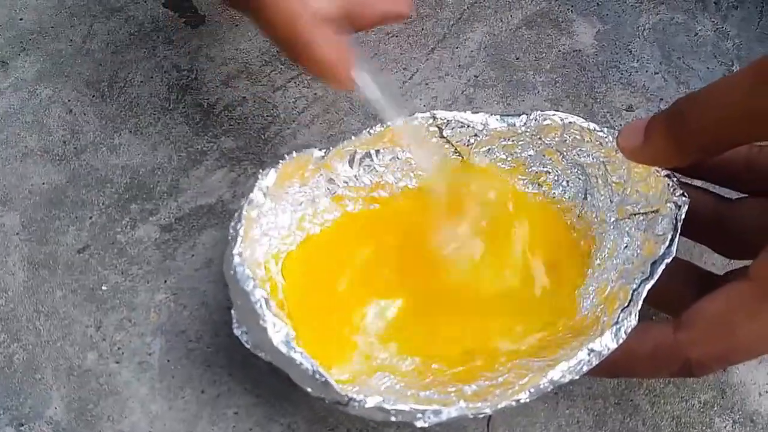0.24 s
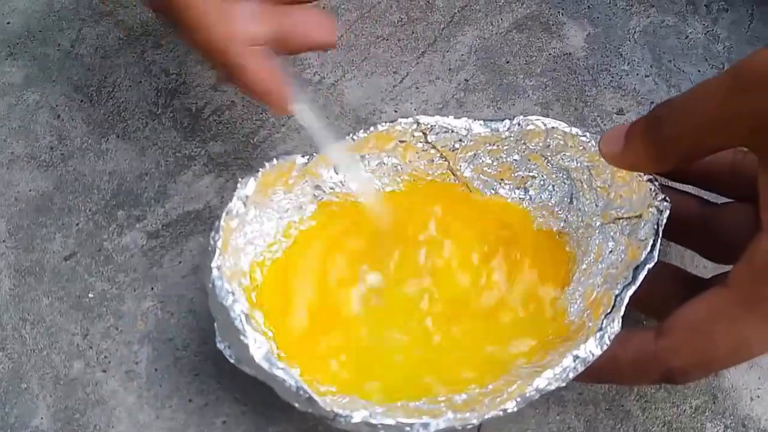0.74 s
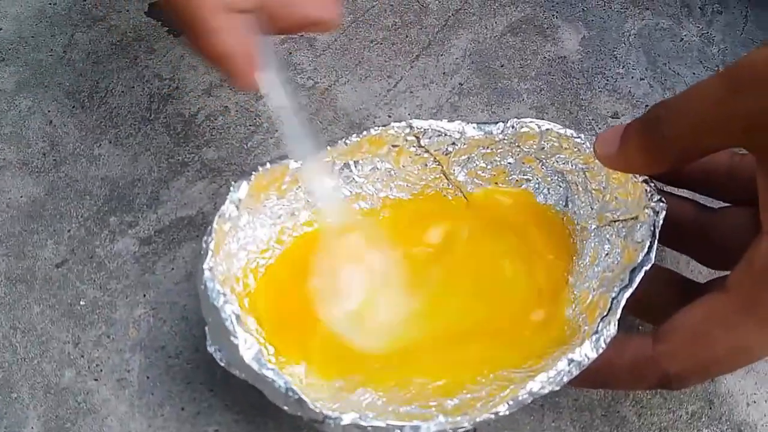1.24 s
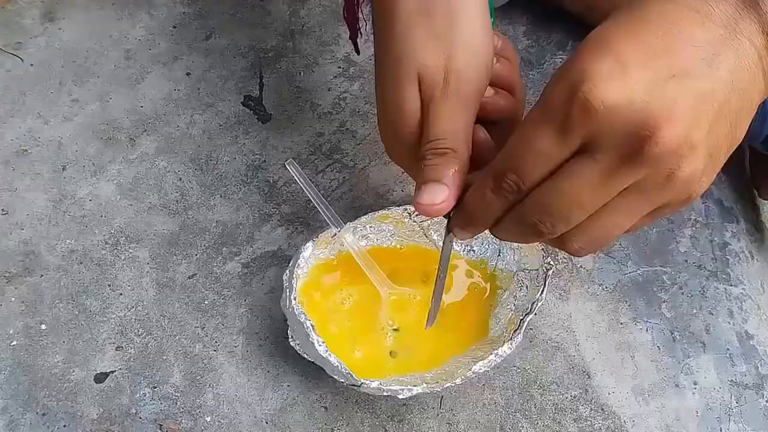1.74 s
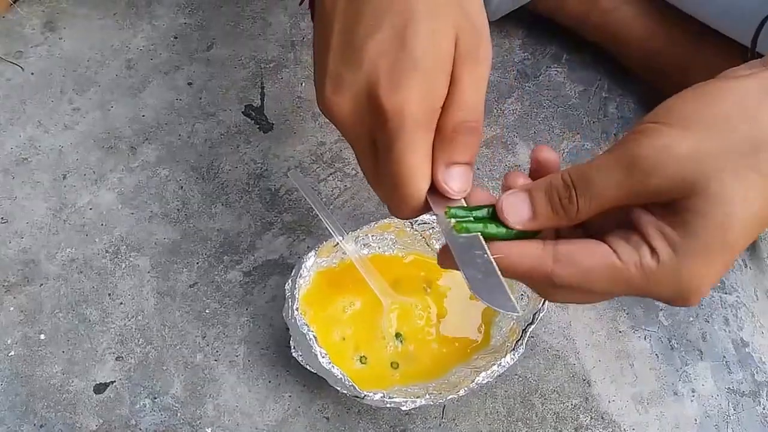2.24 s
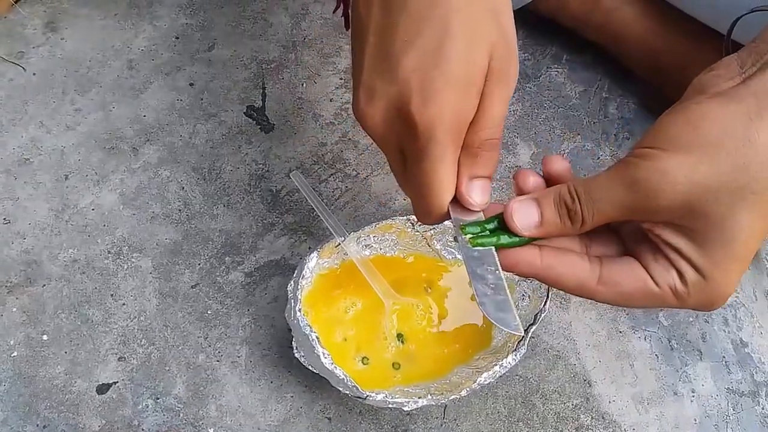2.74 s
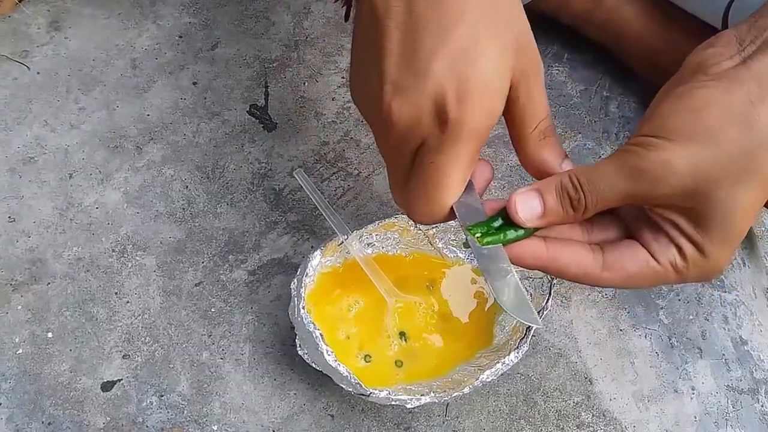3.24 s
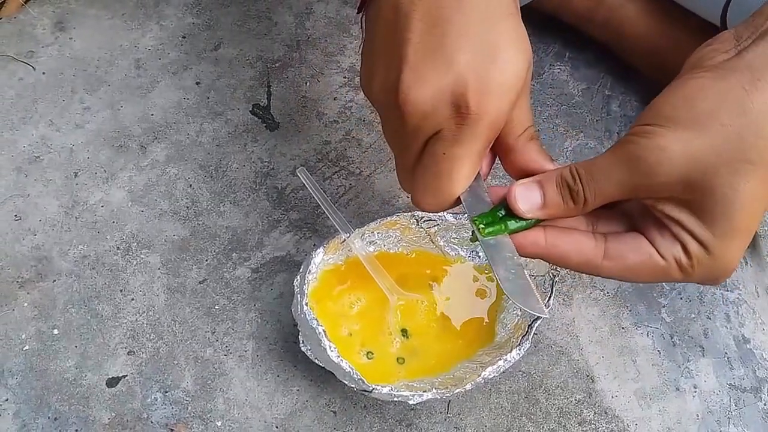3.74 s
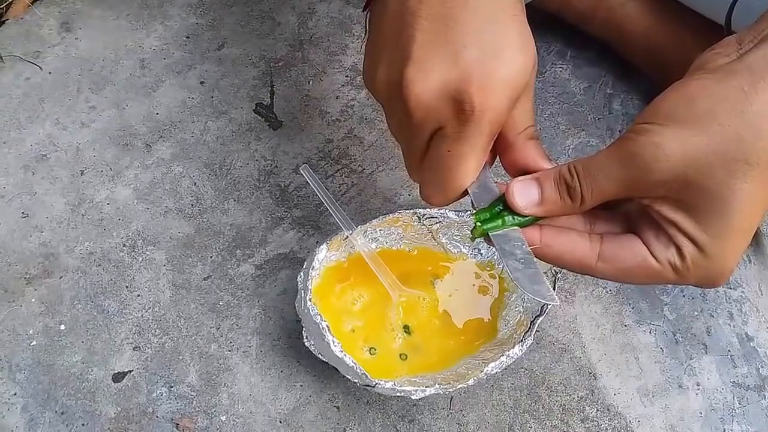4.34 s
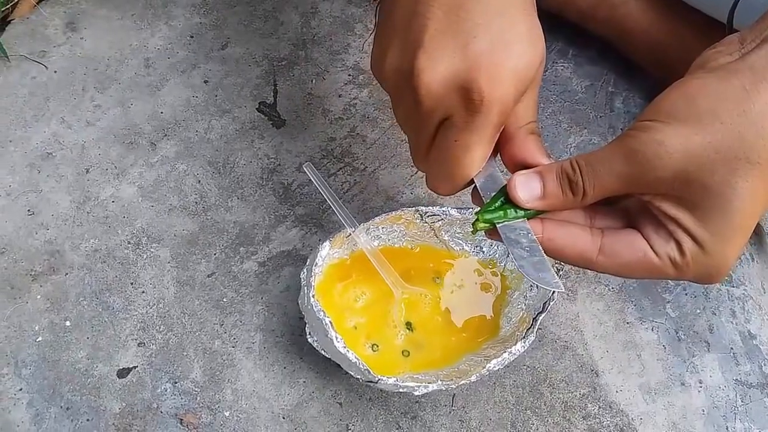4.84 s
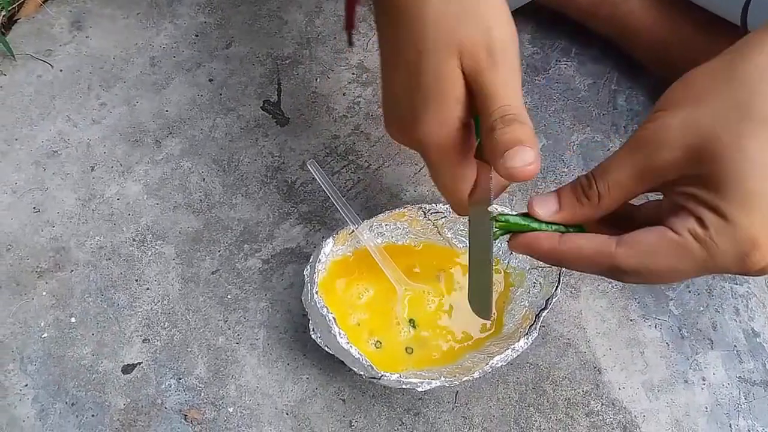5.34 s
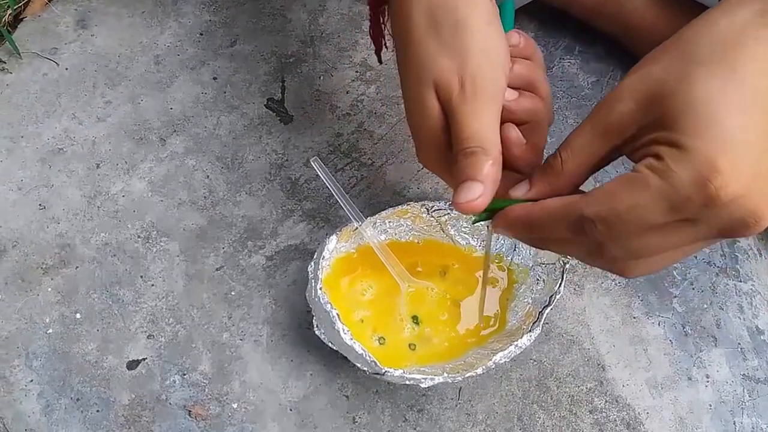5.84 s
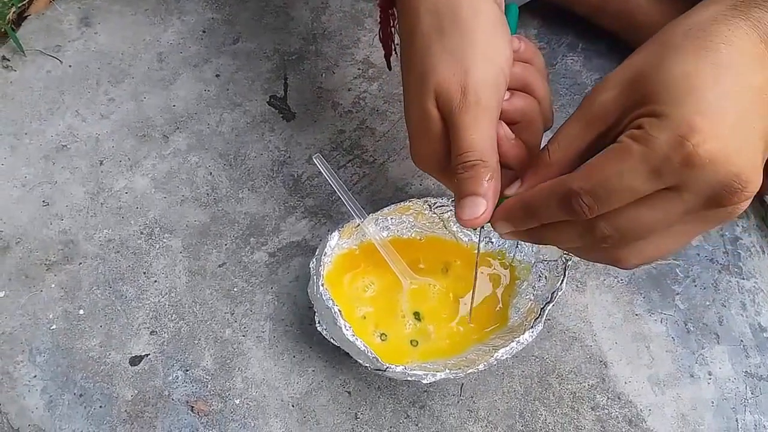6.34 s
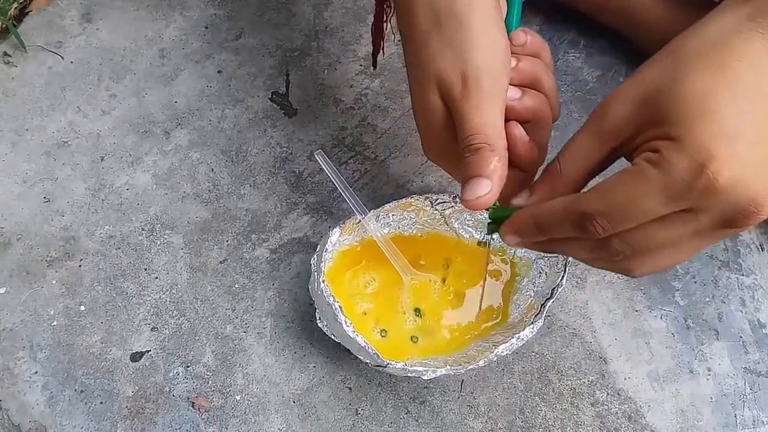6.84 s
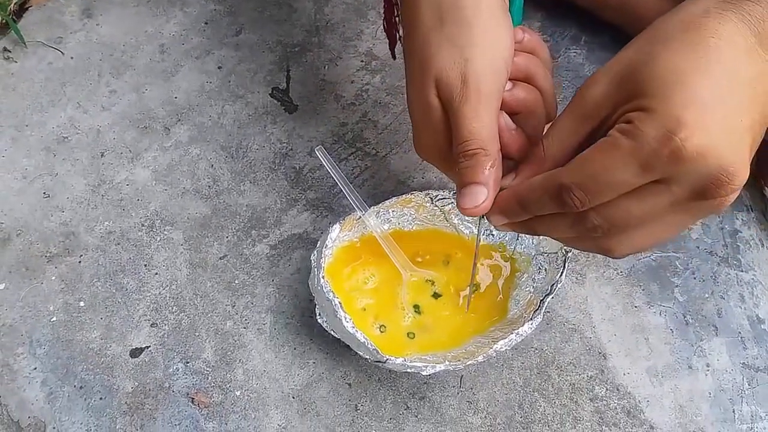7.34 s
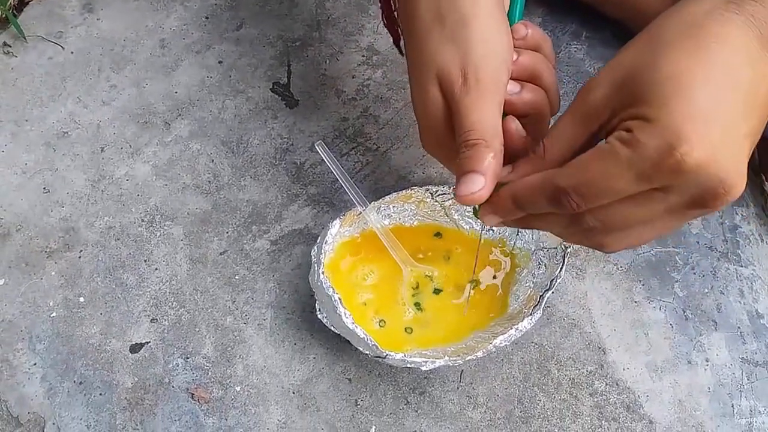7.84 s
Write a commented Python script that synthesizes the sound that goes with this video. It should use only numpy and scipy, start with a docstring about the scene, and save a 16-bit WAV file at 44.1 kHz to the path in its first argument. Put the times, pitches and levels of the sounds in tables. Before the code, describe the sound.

Rapid tinny taps and scrapes on foil mix with hollow, rising egg plops for a second and a half, very near a small microphone. A burst of hard bright snaps cuts them off. Afterwards thin metallic ticks and faint rubs are scattered over a distant steady engine throb, fluttering crickets, chirping sparrows, whistling birds, soft coos and faint caws in open air.

```python
"""Outdoors, close to a small microphone: a plastic fork beats eggs in a crumpled foil bowl, then a knife
snaps and ticks through a chilli. Bursts of tiny snaps ring the foil and blade; pops are short rising tones.
Far off, a slow engine throbs as a sum of steady orders in a wash of shaped noise. Insects are fluttering
noise bands; small birds, a crow and a dove call in gliding, blurred tones with a short echo."""
import sys
import numpy as np
from scipy import signal
from scipy.io import wavfile
from scipy.ndimage import uniform_filter1d

SR = 44100
rng = np.random.default_rng(int(sys.argv[2]) if len(sys.argv) > 2 else 0)


def invert_db(x):
    """Field ratio 10**(x/20) for x, a level in decibels (scalar or array-like)."""
    u = np.asarray(x, float) / 20
    return 10 ** u


def materialize(psi):
    """Save the field psi as 16-bit PCM at rate SR to the path in sys.argv[1].

    A 1-D psi becomes a single channel; in a 2-D psi each row is a channel.
    """
    bounded = np.clip(np.atleast_2d(psi).T, -1, 1)
    quanta = np.round(bounded * 32767).astype(np.int16)
    wavfile.write(sys.argv[1], SR, quanta)


N = 355887
BEAT_END_S = 1.6  # stirring, small unplanned pops and stray taps stop here

# resonances of the foil bowl: centre_hz, width_hz, relative_db
FOIL_MODES = [(1600, 1800, 16), (2800, 770, 23), (5190, 970, 35.5), (6060, 370, 17.5), (7900, 2200, -16)]
# resonances of the blade: centre_hz, width_hz, relative_db
BLADE_MODES = [(750, 240, -31.5), (1850, 500, -9.5), (3540, 1500, 6), (5150, 650, 11.5), (5900, 780, 10),
               (7000, 390, 7), (12800, 3100, -19)]


def evened(x):
    """Scales to rms 1."""
    return x / np.sqrt(np.mean(x ** 2) + 1e-20)


def level_curve(rows):
    """Joins (start_s, level_db) points by straight lines over the whole scene."""
    return np.interp(np.arange(N) / SR, *np.transpose(rows))


def add(mix, s, sound):
    """Mixes a sound in at time s."""
    part = mix[round(s * SR):][:len(sound)]
    part += sound[:len(part)]


def resonate(x, hz, width_hz):
    """Shifts the curve hz down to zero, smooths, and shifts back: a resonance of gain 1."""
    turn = np.exp(2j * np.pi * np.cumsum(hz * np.ones(len(x))) / SR)
    r = np.exp(-np.pi * width_hz / SR)
    smoothed = signal.lfilter([1 - r], [1, -r], x / turn)
    return 2 * (turn * smoothed).real


def wander(per_s):
    """Slow chance: random knots of rms 1 joined by lines; after 600 knots the last value holds."""
    knots = rng.standard_normal(600)
    return np.interp(np.arange(N) * per_s / SR, np.arange(len(knots)), knots)


def chorus(db, hz, width_hz, flutter_db, per_s):
    """Noise through three equal resonances: many blurred sources in one fluttering band."""
    band = rng.standard_normal(N)
    for _ in range(3):
        band = resonate(band, hz, width_hz)
    return invert_db(db + flutter_db * wander(per_s)) * evened(band)


def noise_sweep(s, db, length, from_hz, to_hz, width_hz):
    """A fast, wide sweep: a gliding smear of noise that swells and fades."""
    hz = np.linspace(from_hz, to_hz, round(length * SR))
    smear = resonate(resonate(rng.standard_normal(len(hz)), hz, width_hz), hz, width_hz)
    return s, invert_db(db) * evened(smear) * np.hanning(len(hz))


def ring(clicks, modes, dull):
    """Clicks pass the broad resonances; a dull blow favours the low ones."""
    return sum(invert_db(db - 8.74 * dull * np.log2(hz / 6000)) * resonate(clicks, hz, width) / np.sqrt(width)
               for hz, width, db in modes)


def crackles(events, modes, uneven_db, crack, tail_db, tail_s, spot_db=0):
    """Each blow is one sharp crack, a burst of tiny uneven snaps, then a short ragged rattle.
    Events list start_s, level_db, crackle_s, dullness and perhaps the struck spot's pitch_hz."""
    out, t = np.zeros(N), np.arange(6000) / SR
    for s, db, length, dull, *spot in events:
        sign, hiss = rng.standard_normal((2, len(t)))
        size = rng.exponential(1, len(t))
        burst = np.minimum(t / 0.0011, 1) * np.exp(-(t / max(length, .0005)) ** 2)
        snaps = sign * invert_db(uneven_db * np.minimum(size, 4)) * burst
        drive = snaps / np.linalg.norm(snaps) * np.linalg.norm(burst)
        drive[20] += crack
        ragged = invert_db(2.7 * evened(uniform_filter1d(sign, size=90)))
        rattle = invert_db(tail_db - 60 * t / tail_s) * hiss * ragged
        # the struck spot adds a resonance of its own, 370 Hz wide
        struck = modes + [(hz, 370, spot_db) for hz in spot]
        sound = ring(drive, struck, dull) + ring(rattle, modes, dull + 0.6)  # the treble dies first
        add(out, s - .0004, invert_db(db) * sound / (3 * np.std(ring(hiss, struck, 0))))
    return out


def note(s, length, db, from_hz, to_hz, upper_db=-99, blur_hz=100, blurred=.5, arch=0, waver=0):
    """A gliding tone, partly scattered into a fuzzy band by leaves and distance; caws add a harmonic."""
    size = round(length * SR)
    tremble = evened(uniform_filter1d(rng.standard_normal(size), size=300))
    # arch bends the pitch up mid-note, waver makes it tremble (shares of the pitch)
    bend = 1 + arch * (np.sin(np.linspace(0, np.pi, size)) - .5) + waver * tremble
    hz = np.linspace(from_hz, to_hz, size) * bend
    phase = 2 * np.pi * np.cumsum(hz) / SR
    tone = np.sqrt(2) * (np.sin(phase) + invert_db(upper_db) * np.sin(3 * phase / 2))
    fuzz = evened(resonate(resonate(rng.standard_normal(size), hz, blur_hz), hz, blur_hz))
    broken = evened(uniform_filter1d(rng.standard_normal(size), size=350))
    level = invert_db(db + 4.5 * blurred * broken)  # the more blurred a call, the more its level flutters
    return s, level * ((1 - blurred) * tone + blurred * fuzz) * np.hanning(size) ** 0.17


def sing(rows, **voice):
    """Lays notes of one voice along the scene."""
    out = np.zeros(N)
    for row in rows:
        add(out, *note(*row, **voice))
    return out


def air(patchy_db):
    """Distant wash: random short-time spectra with drifting patches."""
    # spectrum of the wash: centre_hz, relative_db (per Hz)
    spectrum = [(22, -53), (36, -18.5), (60, -4), (110, 2), (190, -2), (268, -11.5), (473, -17.5),
                (647, -22), (1040, -27), (2560, -29), (3600, -33), (6280, -36), (15550, -37.5),
                (15800, -85)]
    hz = np.fft.rfftfreq(2048, 1 / SR)
    real, imaginary, patches = rng.standard_normal((N // 512 + 5, len(hz), 3)).T
    patches = uniform_filter1d(patches, size=20, axis=0)
    patches = evened(uniform_filter1d(patches, size=8, axis=1))
    f, db = np.transpose(spectrum)
    shape = invert_db(np.interp(np.log(hz + 1), np.log(f), db)[:, None] + patchy_db * patches)
    wash = signal.istft((real + 1j * imaginary) * shape, nperseg=2048, noverlap=1536)[1][:N]
    above_hum = signal.sosfilt(signal.butter(4, 200, "high", fs=SR, output="sos"), wash)
    return invert_db(-57.5) * wash / np.std(above_hum)  # the level counts only what lies above 200 Hz


def engine(start_s, smear, waver_db):
    """Steady orders of a slow engine; the pipe smears each firing, distance makes each order waver."""
    # orders of the engine: multiple of the firing cycle, relative_db
    orders = [(4, -23), (5, -10), (7, -3), (8, 5), (10, 0.5), (11, -0.5), (12, -23), (13, -11), (14, -4),
              (15, -9.5), (16, -1), (18, -28), (19, -25)]
    firing_hz, level_db = 11.49, -52
    cycle = 2 * np.pi * firing_hz * (np.arange(N) / SR - start_s)
    throb = sum(invert_db(db + waver_db * wander(2.195)) * np.cos(k * cycle - smear * k * k) for k, db in orders)
    return invert_db(level_db) * evened(throb)


def insects():
    """Many far insects blur into a fluttering band of noise."""
    # chorus level before its low edge is cut: start_s, level_db
    swell = [(0.0, -62), (.9, -65), (1.57, -56.5), (1.95, -65), (2.2, -67.5), (2.85, -61), (3.05, -70),
             (3.7, -62.5), (4.15, -71), (4.5, -58), (4.75, -64), (5.3, -57), (6.09, -64.5), (6.9, -58.5),
             (7.17, -64.5), (7.51, -59), (8.07, -66)]
    return chorus(level_curve(swell), hz=4740, width_hz=1560, flutter_db=4, per_s=25)


def high_insects():
    """A thinner insect band, higher up, flutters slowly."""
    # start_s, level_db
    swell = [(0.0, -85), (1.84, -71.5), (2.3, -78), (4.8, -71), (8.07, -75)]
    return chorus(level_curve(swell), hz=7580, width_hz=790, flutter_db=3, per_s=6)


def far_birds():
    """Twitter of distant birds, blurred into a band of noise."""
    # start_s, level_db
    swell = [(0.0, -58), (.43, -68.5), (1.91, -63), (2.02, -70.5), (3.53, -70), (4.14, -63), (4.92, -70),
             (7.46, -74.5), (8.07, -64.5)]
    return chorus(level_curve(swell), hz=2983, width_hz=810, flutter_db=3.5, per_s=22)


def low_rumble():
    """A low band of noise rises, drops away, then slowly swells to the end."""
    # start_s, level_db
    swell = [(0.0, -68), (1.9, -60.5), (2.3, -86.5), (8.07, -64.5)]
    return chorus(level_curve(swell), hz=254, width_hz=450, flutter_db=-1.5, per_s=7.9)


def swelling_wash(end_db, db_per_s):
    """A broad mid wash of noise swells steadily up to the end."""
    t = np.arange(N) / SR
    return chorus(end_db - db_per_s * (t[-1] - t), hz=864, width_hz=2900, flutter_db=1.0, per_s=13)


def stir(snaps_per_s, uneven_db):
    """Fine random crackle of foil while the fork drags through the egg."""
    snaps = invert_db(uneven_db * np.minimum(rng.exponential(1, N), 4)) * (rng.random(N) < snaps_per_s / SR)
    snaps *= rng.choice([-1, 1], N)
    dragging = np.arange(N) / SR < BEAT_END_S
    return invert_db(-65.5 + 2.0 * wander(5.8)) * dragging * evened(ring(snaps, FOIL_MODES, 0.74))


def stray_taps(count, db, spread_db):
    """Faint unplanned touches of the tines between the strokes."""
    return [(s * BEAT_END_S, db + spread_db * g, dull) for s, g, dull in rng.random((count, 3))]


def fork():
    """Plastic tines tap and rake the crumpled foil, ringing its broad resonances."""
    # taps on the foil: start_s, level_db, dullness, pitch_hz (of the struck spot)
    strokes = [(.034, -39.5, 1.05, 5800), (.058, -24, 0, 7700), (.102, -26.5, 0.61, 5040),
               (.196, -44, 0.8, 2800), (.304, -30, 0, 6030), (.315, -30.5, 0.75, 5500),
               (.334, -35, .2, 5200), (.446, -31.5, 0, 7000), (0.4695, -24.5, 0.23, 5130),
               (.494, -38, .2, 4700), (.614, -36, 0, 4900), (0.644, -31.5, 0.7, 5400),
               (0.6558, -29, 0.8, 7600), (0.672, -49.5, 1.1, 1410), (.701, -38, 0, 6300),
               (0.8348, -23.5, 0, 7300), (.84, -23, 0.63, 5630), (0.8674, -25, 0.96, 5300),
               (1.0248, -30, 0.32, 6000), (1.037, -25, 0.33, 6250), (1.2205, -24, 0.35, 5960),
               (1.225, -35, .8, 5000), (1.4252, -21.5, 0, 5500)]
    # tines rake the foil: start_s, level_db
    scrapes = [(.08, -54), (.098, -32), (.14, -43), (.16, -49), (0.454, -45), (.85, -63), (.91, -50),
               (1.448, -43), (1.48, -39), (.114, -38), (.126, -35.5), (.306, -30.5), (.505, -46),
               (.715, -47), (.694, -37), (.869, -32), (.894, -35.5), (1.27, -38.5), (1.281, -37),
               (1.435, -31.5), (1.4635, -33)]
    tap_s, scrape_s, scrape_dull = 0.005, 0.013, 0.52  # lengths of the crackle
    touches = strokes + stray_taps(count=90, db=-61.5, spread_db=15.5)
    events = [(s, db, tap_s, *colour) for s, db, *colour in touches]
    events += [(s, db, scrape_s, scrape_dull) for s, db in scrapes]
    return crackles(events, FOIL_MODES, uneven_db=12.0, crack=4.9, tail_db=-21.0, tail_s=0.079, spot_db=34.5)


def slosh(count, db, spread_db):
    """Many small unplanned pops while the egg is beaten."""
    return [(s * BEAT_END_S, db + spread_db * g, 600 * 9.3 ** p) for s, p, g in rng.random((count, 3))]


def plops(rise, wet):
    """Hollow pops ring briefly, with a rising, slightly wobbling pitch."""
    # hollow pops: start_s, level_db, pitch_hz (at the start)
    pops = [(.06, -42, 1528), (.081, -43, 1180), (.116, -35, 1780), (.118, -40.5, 620), (.132, -40, 1480),
            (.196, -44.5, 720), (.268, -41, 2960), (.305, -32.5, 1635), (.318, -35, 1600),
            (.47, -34.5, 1600), (.555, -47, 970), (.643, -43, 694), (.655, -37, 1810), (.672, -45, 915),
            (.791, -40.5, 1780), (.838, -39, 1600), (.842, -27.5, 2320), (.867, -40.5, 704),
            (.88, -39, 2190), (.899, -45, 1060), (1.037, -43.5, 1680), (1.225, -26, 1850),
            (1.271, -37, 660), (1.419, -31, 1846), (1.427, -43, 580), (1.674, -22.5, 1535),
            (1.675, -30, 750), (1.732, -37, 934)]
    t60_s = 0.037
    out, t = np.zeros(N), np.arange(4000) / SR
    for s, db, hz in pops + slosh(count=110, db=-61.5, spread_db=9.5):
        wobble = evened(uniform_filter1d(rng.standard_normal(len(t)), size=70))
        phase = 2 * np.pi * hz * (t + rise * t ** 2) + wet * wobble
        add(out, s, invert_db(db - 60 * t / t60_s) * (1 - np.exp(-t / 0.00017)) * np.sin(phase))
    return out


def short_glides():
    """Short gliding notes, mostly whistles of small birds; the one at 1.31 s is a rising pop."""
    # start_s, length_s, level_db, from_hz, to_hz
    glides = [(0.061, 0.041, -54, 3218, 3170), (0.273, 0.073, -54, 3230, 3180),
              (0.472, 0.068, -52.5, 2770, 2560), (.885, 0.042, -53, 2390, 3400),
              (1.04, 0.04, -58, 2490, 2800), (1.31, 0.023, -53, 2080, 2470), (1.34, 0.032, -61, 3050, 3000),
              (1.83, 0.065, -59.5, 2480, 2800), (2.25, 0.05, -66, 3060, 2980),
              (2.48, 0.029, -63, 3210, 2990), (1.111, .11, -55, 3196, 2510), (2.62, 0.063, -60, 3160, 2900),
              (3.81, 0.034, -59, 2910, 2630), (3.919, 0.029, -52, 3170, 2960),
              (3.996, 0.057, -50.5, 2652, 2800), (4.074, 0.065, -51, 3035, 3077),
              (4.23, 0.051, -58, 2305, 2440), (4.251, 0.082, -53, 2824, 2810),
              (4.74, 0.074, -61.5, 2640, 3164), (4.889, 0.12, -64.5, 2570, 2190),
              (5.108, 0.27, -61, 2915, 2906), (5.752, 0.1, -62.5, 3150, 3070),
              (5.85, 0.056, -53, 3150, 3120), (6.948, 0.04, -60, 2750, 2800)]
    return sing(glides, blur_hz=200, blurred=.4, waver=.006)


def crickets(width_hz, throb_s):
    """A narrow band of noise throbs in short trills."""
    # start_s (first throb), length_s, gap_s (between throbs), level_db, pitch_hz
    trills = [(1.24, 0.26, 0.078, -58.5, 4570), (2.165, .05, .08, -58.5, 5000),
              (2.265, 0.44, 0.075, -60, 4600), (2.79, .25, .077, -63.5, 5100),
              (3.159, .34, 0.074, -57.5, 4640), (3.69, .35, .108, -62.5, 5120),
              (5.684, 0.39, 0.072, -55, 4620), (6.586, .49, 0.074, -57, 4550), (7.581, .5, .077, -56, 4570)]
    t, gate, hz = np.arange(N) / SR, np.zeros(N), np.full(N, float(trills[0][-1]))
    for s, length, gap, db, pitch_hz in trills:
        hz[t > s - 2 * throb_s] = pitch_hz
        for throb_at in np.arange(s, s + length, gap):
            gate += invert_db(db) * np.exp(-((t - throb_at) / throb_s) ** 2)
    return gate * chorus(0, hz, width_hz, flutter_db=3, per_s=120)


def dove():
    """Low coos whose pitch falls slightly and trembles."""
    # start_s, length_s, level_db, pitch_hz (at the start)
    coos = [(1.5, 0.15, -63, 443), (1.75, 0.11, -64, 497), (5.53, 0.11, -68.5, 544), (5.71, 0.19, -63, 526),
            (5.9, 0.27, -62, 490), (6.11, 0.27, -63.5, 520)]
    fall = 0.0416  # share of the pitch
    return sing([(*row, row[-1] * (1 - fall)) for row in coos], blur_hz=45, blurred=.3, waver=.006)


def knife():
    """The blade snaps through the chilli and rubs on, ringing its own resonances."""
    # snaps: start_s, level_db, dullness (below zero bright), crackle_s, pitch_hz (of the struck spot)
    snaps = [(1.622, -32, .4, .003, 4700), (1.626, -22.5, -1.1, 0.0018, 8200),
             (1.6374, -4.5, -1.7, 0.001, 5650), (1.6735, -2, 0.7, 0.0033, 7600),
             (1.6759, -5.5, 0.59, 0.0026, 6200), (1.691, -26, .4, .006, 5500),
             (1.698, -21, 0.4, 0.0027, 4700), (1.706, -28, 0.087, 0.0099, 5200),
             (1.731, -4.5, 0.39, 0.0032, 4770), (1.734, -9.5, -0.025, 0.0017, 5240),
             (1.964, -36, 0.74, 0.0053, 4840), (1.9966, -36, 0.73, 0.0037, 7000),
             (2.8617, -22, -0.55, 0.0014, 5270), (4.309, -23, -1.7, 0.0063, 6200),
             (6.3113, -32.5, 1, 0.0022, 6800), (6.3853, -29, 0.41, 0.0023, 5840),
             (6.7, -32.5, -1.2, 0.0085, 6350), (7.339, -30.5, 0.64, 0.0054, 5800),
             (7.51, -17.5, -0.79, 0.0012, 5340), (7.54, -28.5, 0.67, 0.0036, 6660),
             (7.661, -42, 1, .004, 1600), (7.73, -35, .1, 0.0027, 6500)]
    # the blade rubs on: start_s, level_db, crackle_s
    rustles = [(4.316, -43, 0.049), (6.707, -51, .03), (7.35, -42, 0.011), (7.913, -56, 0.15),
               (4.4, -60, .12)]
    events = [(s, db, length, dull, hz) for s, db, dull, length, hz in snaps]
    events += [(*row, 0.47) for row in rustles]  # dullness
    return crackles(events, BLADE_MODES, uneven_db=3.5, crack=1.7, tail_db=-18, tail_s=0.065, spot_db=16)


def ticks():
    """Light, bright ticks of the blade."""
    # start_s, level_db (before the body is cut)
    touches = [(1.649, -34), (1.66, -27), (3.0944, -39), (3.5098, -32), (3.54, -39), (3.941, -37),
               (4.067, -35), (4.119, -33), (4.148, -39), (4.1633, -30), (4.2582, -33), (4.384, -41),
               (4.4024, -35), (4.462, -41), (4.538, -30.5), (4.583, -35), (4.681, -40), (4.7486, -32),
               (4.81, -38), (4.882, -37), (5.19, -41), (5.361, -33.5), (6.2883, -37), (6.506, -34),
               (6.6672, -40), (6.798, -40), (7.336, -31), (7.384, -40), (7.44, -41), (7.447, -38),
               (7.46, -35), (7.49, -38), (7.531, -31)]
    events = [(s, db, .0018, -1) for s, db in touches]
    clicks = crackles(events, BLADE_MODES, uneven_db=4.0, crack=2.4, tail_db=-12, tail_s=0.046)
    # thin ticks have no body
    return signal.sosfilt(signal.butter(3, 4700, "high", fs=SR, output="sos"), clicks)


def loose_rattle():
    """A loose rattle after the loudest snaps: a band of noise that sinks in pitch."""
    # start_s, level_db, length_s, from_hz, to_hz, width_hz
    sinking = (1.68, -46.5, 0.0748, 4000, 3000, 1500)
    out = np.zeros(N)
    add(out, *noise_sweep(*sinking))
    return out


def sparrows():
    """Broad chirps heard from afar: fast rising smears of noise."""
    # start_s, level_db
    chirps = [(2.04, -57), (2.298, -61), (2.41, -59), (2.52, -58), (2.7, -59.5), (3.039, -59), (3.33, -62),
              (3.44, -57.5), (3.659, -55.5), (3.809, -57), (3.939, -55.5), (4.272, -56), (4.413, -57),
              (6.24, -59.5), (6.502, -61), (7.699, -57)]
    out = np.zeros(N)
    for s, db in chirps:
        add(out, *noise_sweep(s, db, length=0.047, from_hz=2300, to_hz=3870, width_hz=2000))
    return out


def crow():
    """Caws of two harmonics that arch and sag, with hoarse notes to open and close each."""
    # start_s, level_db (2nd harmonic), pitch_hz (2nd harmonic), upper_db (3rd harmonic above the 2nd)
    calls = [(2.27, -67.5, 1156, -1), (2.83, -67.5, 1132, 4.5), (5.89, -65.5, 1194, -16)]
    # hoarse ends: start_s (from the caw), length_s, relative_db (above the caw), from_hz, to_hz
    ends = [(-.04, 0.063, 2.5, 1470, 1513), (0.156, 0.07, 6.5, 1620, 1323)]
    caw_s, sag = 0.205, 0.0708  # sag is a share of the pitch
    caws = [(s, caw_s, db, hz, hz * (1 - sag), upper_db) for s, db, hz, upper_db in calls]
    hoarse = [(s + at, length, db + rel_db, from_hz, to_hz)
              for s, db, *_ in calls for at, length, rel_db, from_hz, to_hz in ends]
    voiced = sing(caws, blur_hz=60, blurred=.3, arch=.06, waver=.006)
    return voiced + sing(hoarse, blur_hz=250, blurred=.6, waver=.012)


def songbird():
    """A four-note phrase of arched glides, repeated at different paces."""
    # one phrase: start_s (before stretching), length_s, relative_db, from_hz, to_hz
    phrase = [(0.008, 0.0376, -0.5, 2620, 2850), (0.188, 0.038, 0, 3024, 2553),
              (0.348, .05, -2, 2560, 2050), (.4, 0.038, 1.5, 2330, 2343)]
    # start_s, level_db, stretch (of the spacing of the notes)
    songs = [(2.3, -52.5, 1.04), (3.765, -52.5, 0.93), (5.062, -52, 1.1)]
    notes = [(s + stretch * at, length, db + rel_db, from_hz, to_hz)
             for s, db, stretch in songs for at, length, rel_db, from_hz, to_hz in phrase]
    return sing(notes, blur_hz=260, blurred=.48, arch=.045, waver=.012)


def squawks():
    """Hoarse notes, mostly lower, with a trembling pitch."""
    # start_s, length_s, level_db, from_hz, to_hz
    hoarse = [(6.839, 0.084, -54, 268, 265), (7.18, 0.091, -65, 1916, 1920),
              (7.482, 0.13, -63.5, 1770, 2050), (7.909, 0.15, -60.5, 3060, 2940)]
    return sing(hoarse, blur_hz=250, blurred=.6, waver=.012)


def with_echo(calls, echo_db, echo_s):
    """Adds a short diffuse echo from walls and trees: noise decaying by 60 dB in echo_s."""
    t = np.arange(SR // 2) / SR
    tail = rng.standard_normal(len(t)) * invert_db(-60 * t / echo_s) * (t > .01)
    return calls + invert_db(echo_db) * signal.oaconvolve(calls, tail / np.linalg.norm(tail))[:N]


def scene():
    """All sources at one microphone."""
    far = air(patchy_db=1.5) + engine(start_s=0.02967, smear=0.051, waver_db=2.5)
    chirr = insects() + crickets(width_hz=780, throb_s=0.027)
    far += signal.sosfilt(signal.butter(6, 4250, "high", fs=SR, output="sos"), chirr)  # band starts abruptly
    far += high_insects() + far_birds() + low_rumble() + swelling_wash(end_db=-62, db_per_s=7.5)
    calls = short_glides() + dove() + sparrows() + crow() + songbird() + squawks()
    far += with_echo(calls, echo_db=-6.5, echo_s=0.4)
    near = stir(snaps_per_s=1800, uneven_db=5.0) + fork() + knife() + ticks() + loose_rattle()
    # small light objects radiate little bass; the small microphone passes little of the top treble
    edges = signal.butter(2, [450, 11000], "band", fs=SR, output="sos")
    return (far + signal.sosfilt(edges, near) + plops(rise=3.3, wet=0.55))[None]


def low_pass(x):
    """Removes everything above the highest recorded frequency."""
    return signal.sosfilt(signal.butter(12, 16790, fs=SR, output="sos"), x)


def record(dry):
    """Limits the band steeply at 15650 Hz and returns the finished mix."""
    finished = signal.sosfilt(signal.ellip(8, .5, 30, 15650, fs=SR, output="sos"), dry)
    return low_pass(finished)


dry = scene()
out = record(dry)
materialize(out)
```